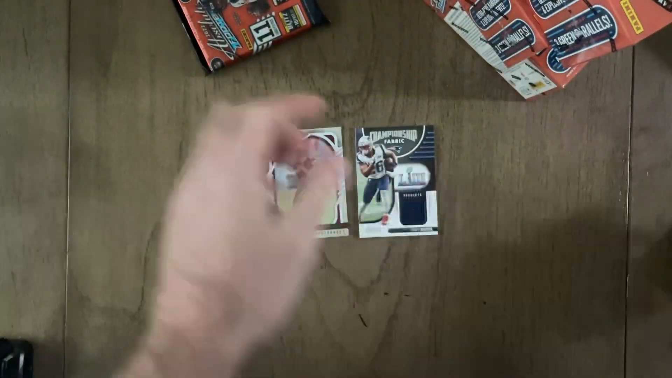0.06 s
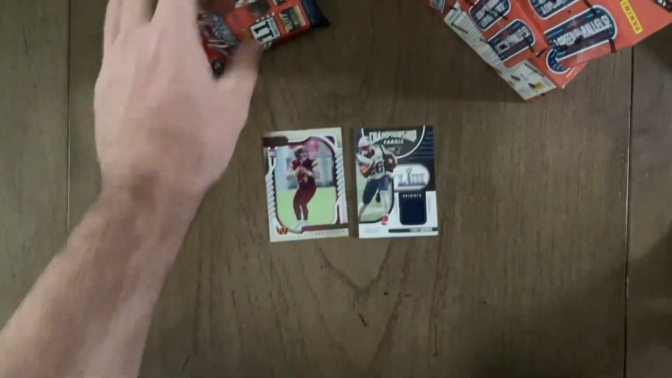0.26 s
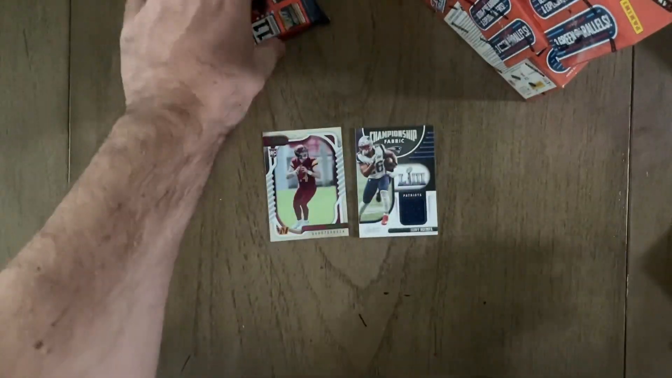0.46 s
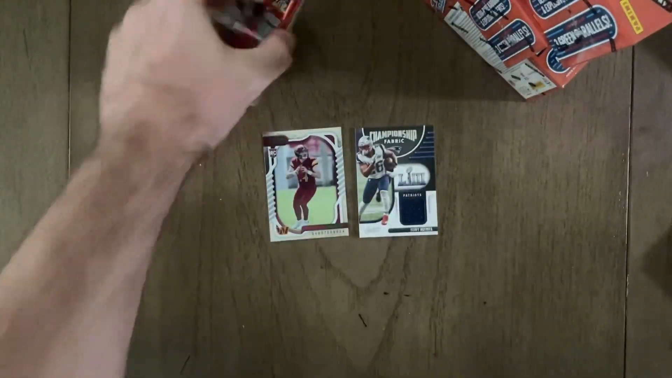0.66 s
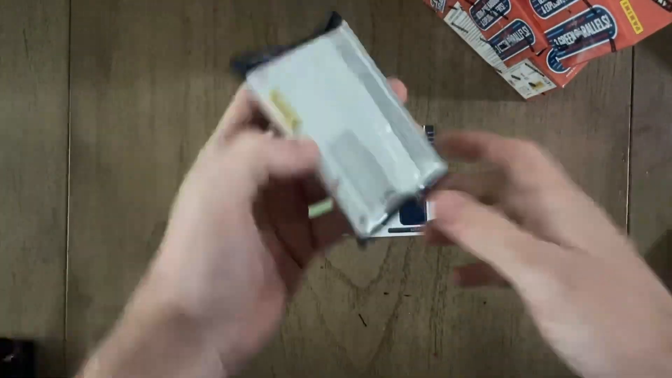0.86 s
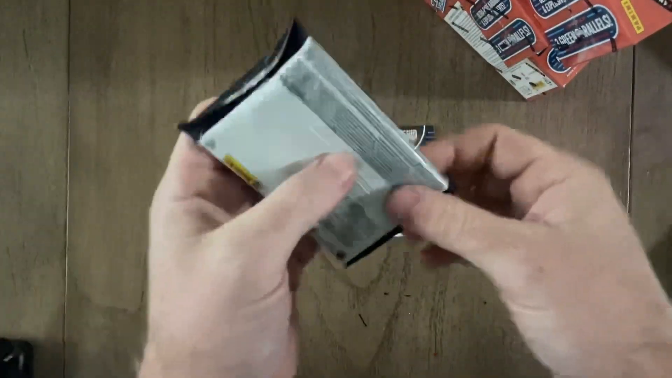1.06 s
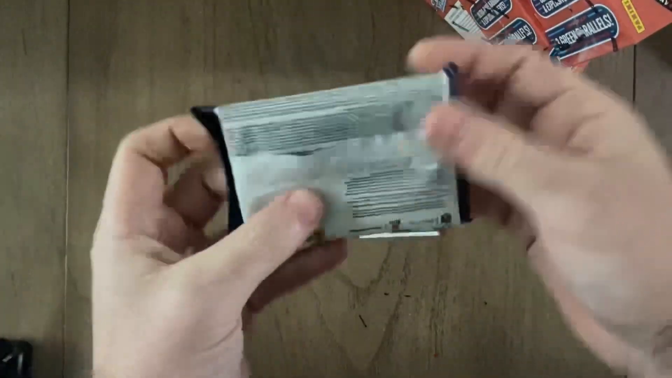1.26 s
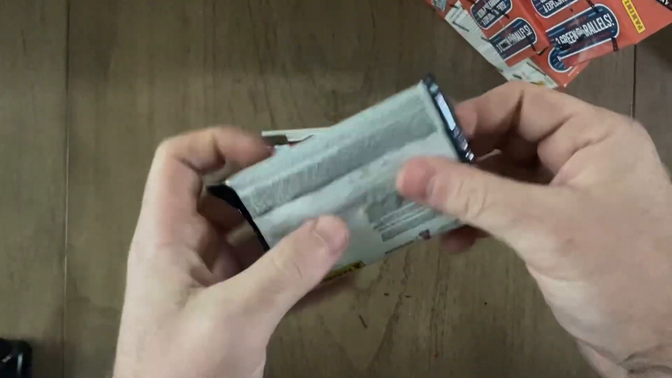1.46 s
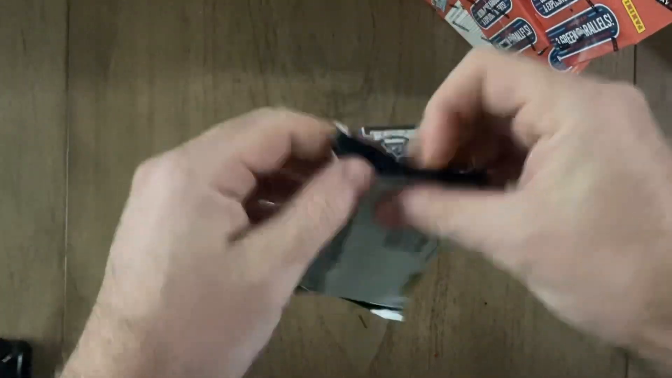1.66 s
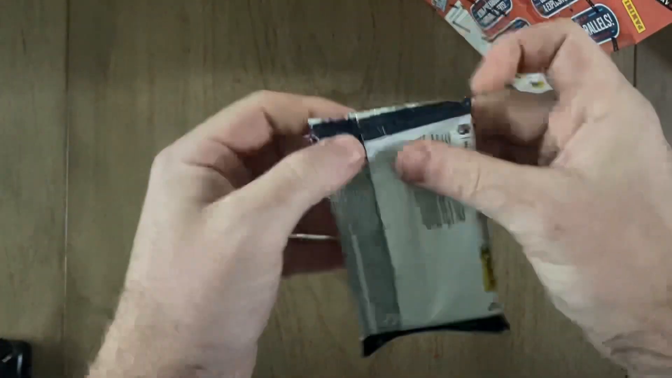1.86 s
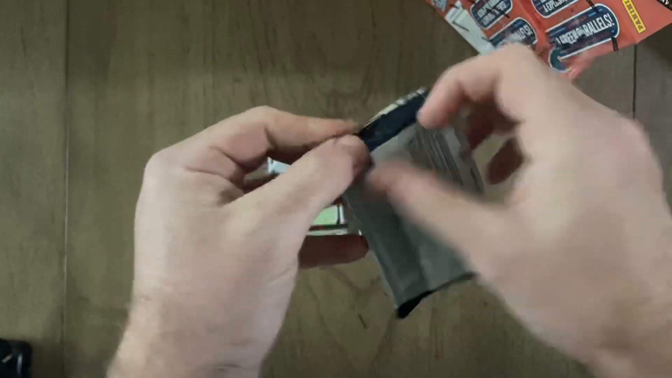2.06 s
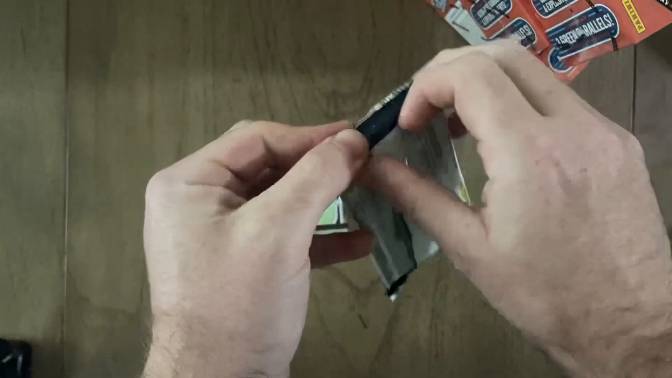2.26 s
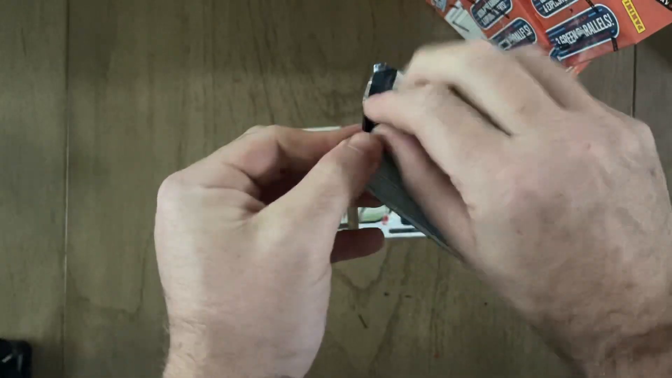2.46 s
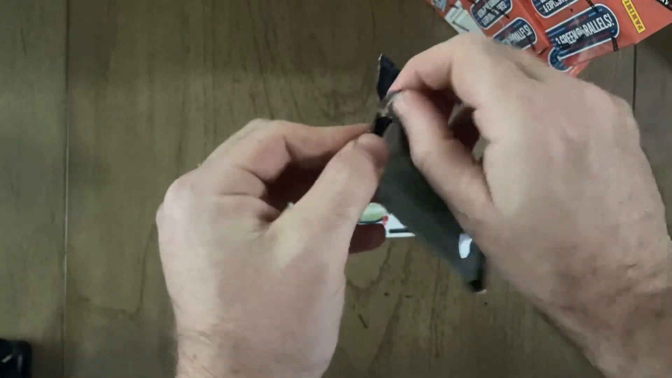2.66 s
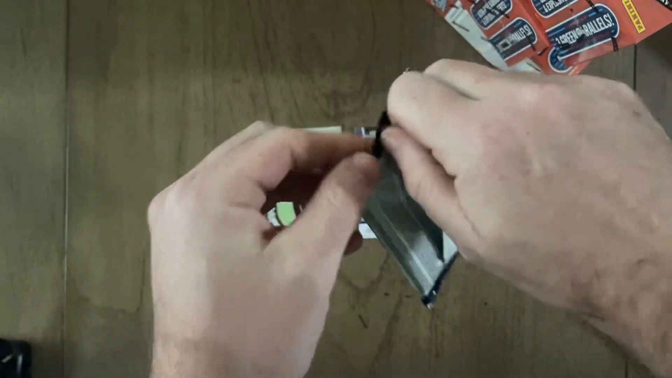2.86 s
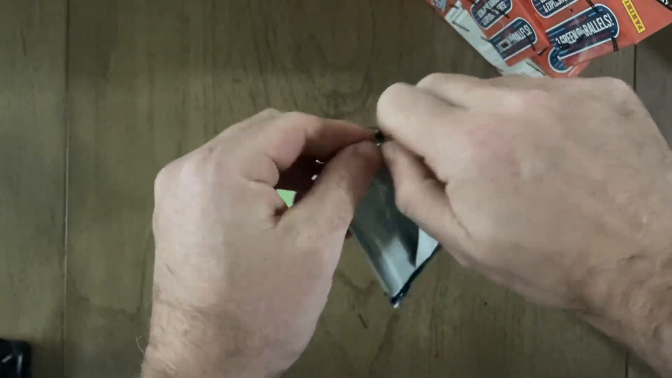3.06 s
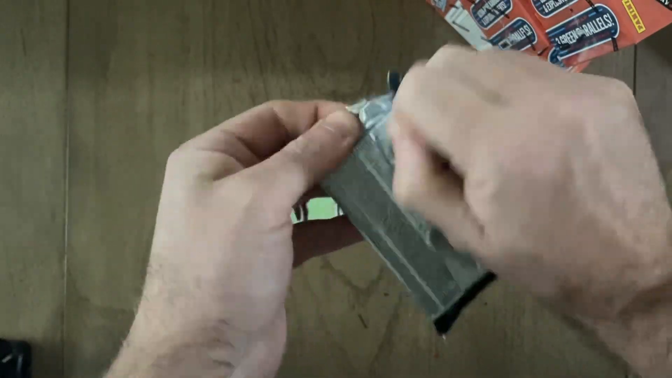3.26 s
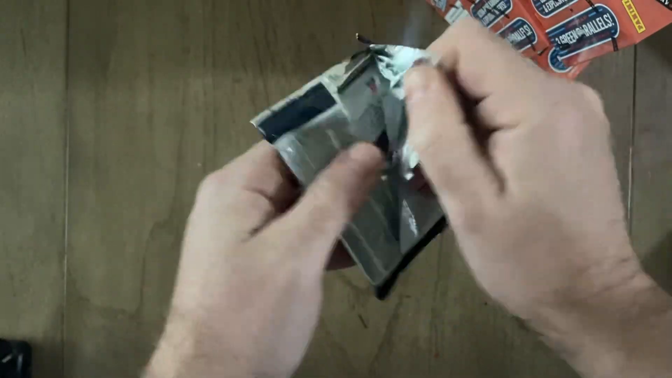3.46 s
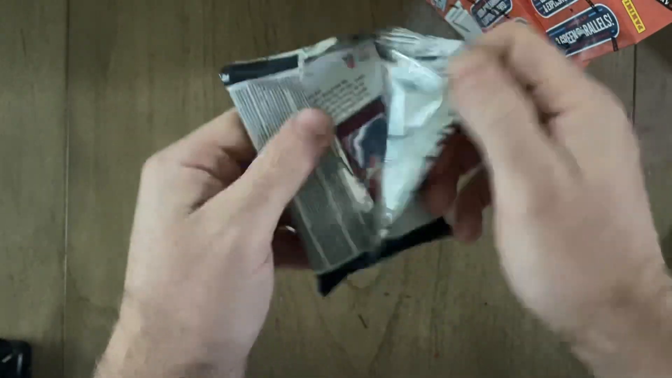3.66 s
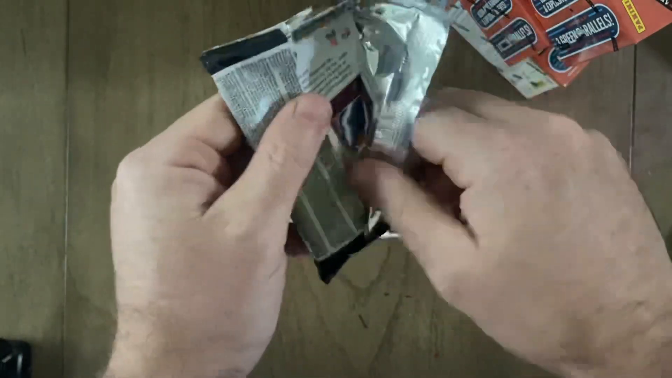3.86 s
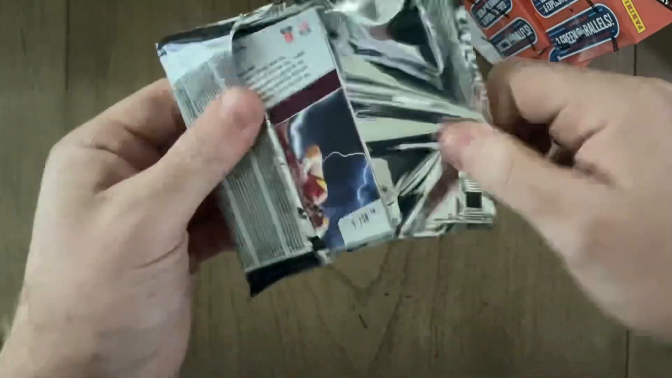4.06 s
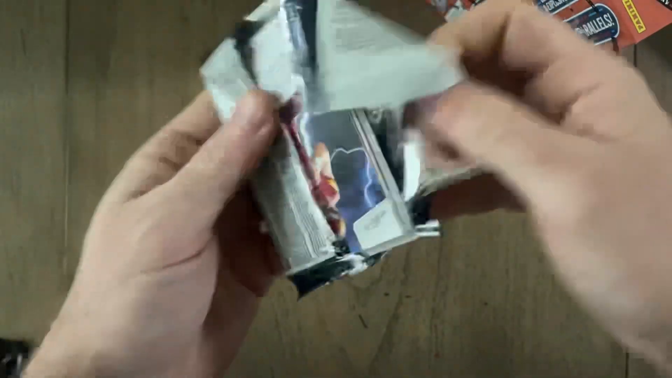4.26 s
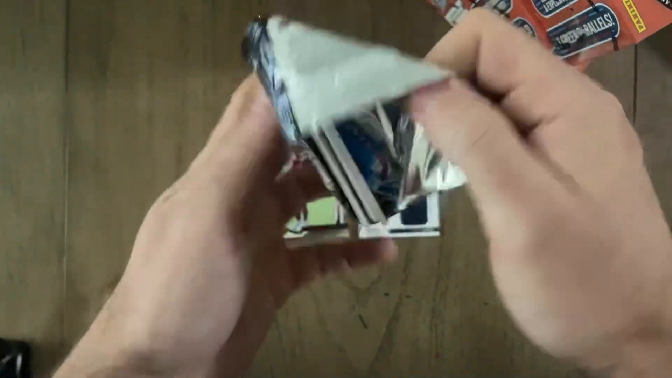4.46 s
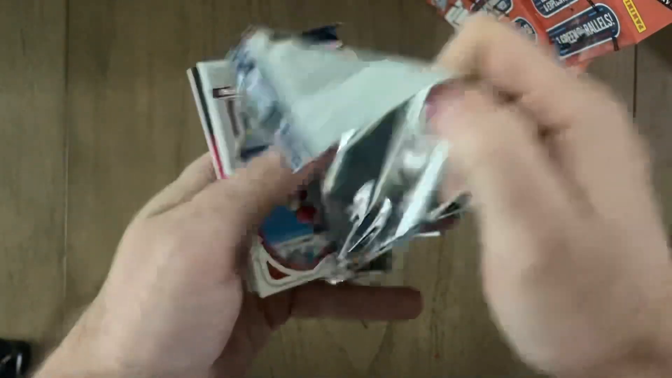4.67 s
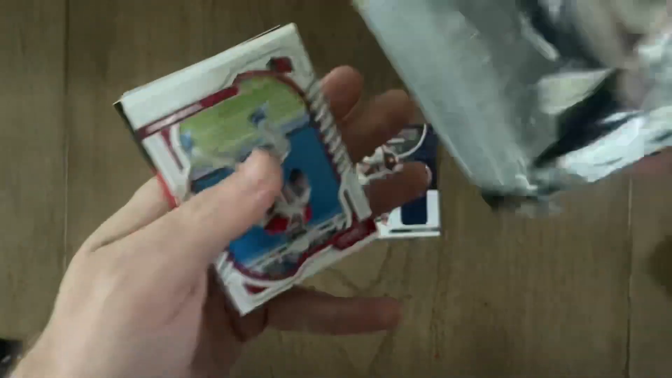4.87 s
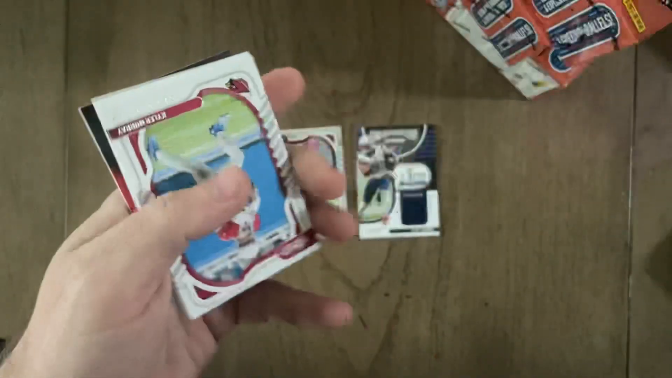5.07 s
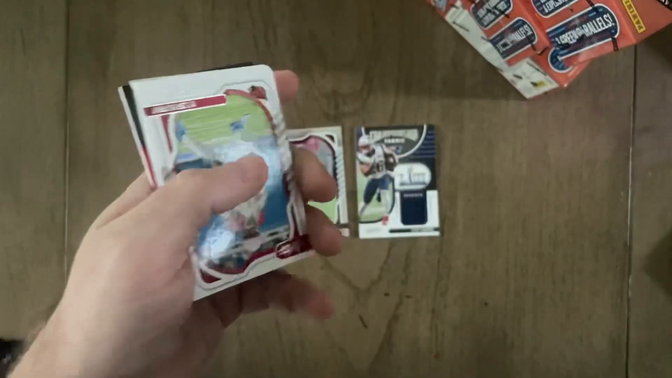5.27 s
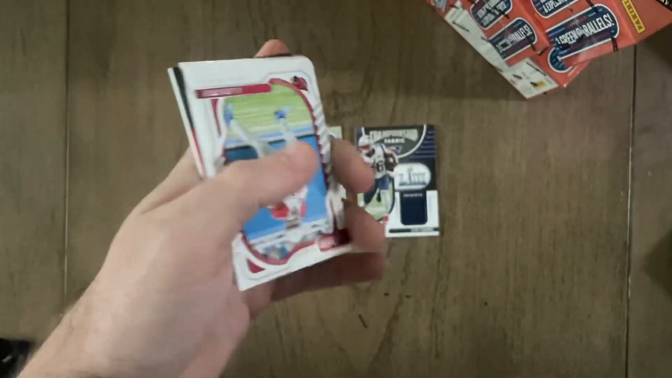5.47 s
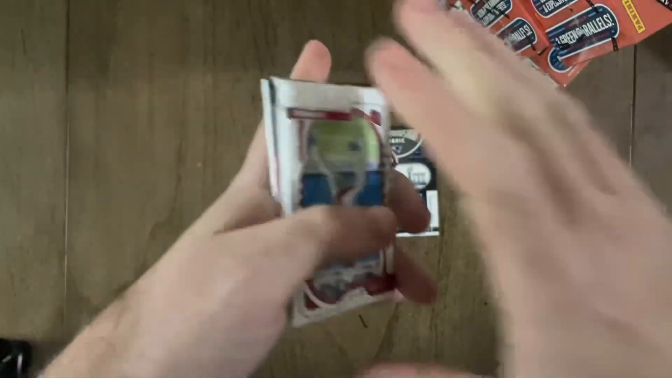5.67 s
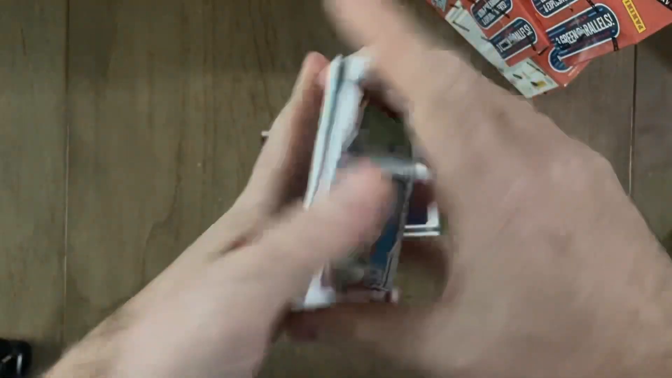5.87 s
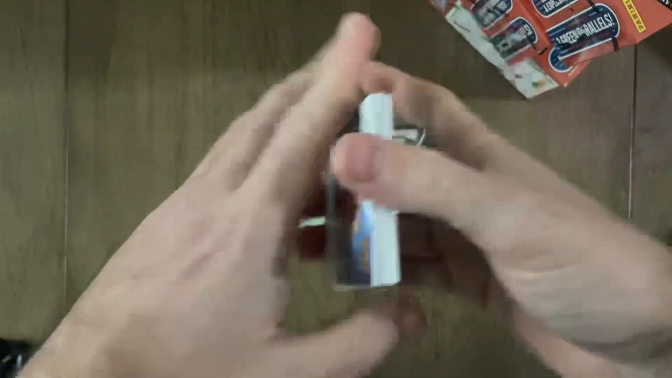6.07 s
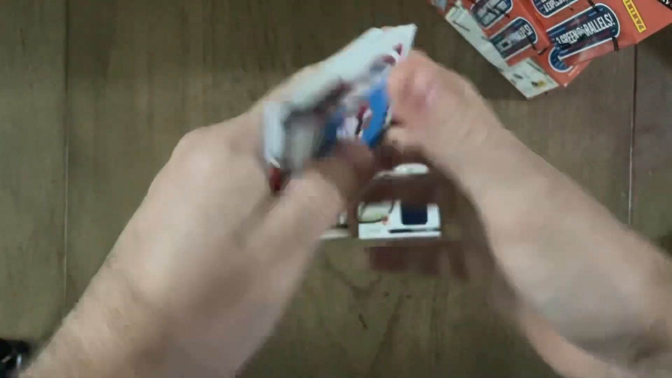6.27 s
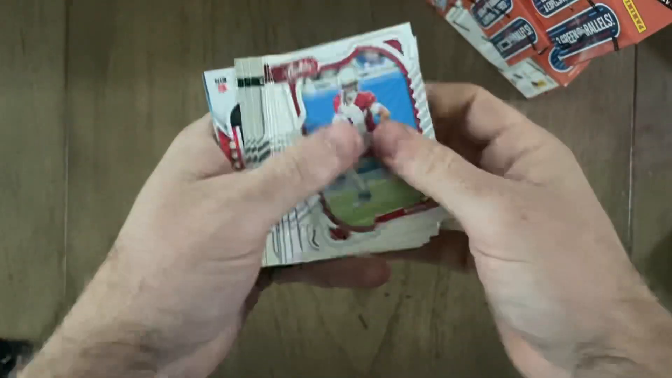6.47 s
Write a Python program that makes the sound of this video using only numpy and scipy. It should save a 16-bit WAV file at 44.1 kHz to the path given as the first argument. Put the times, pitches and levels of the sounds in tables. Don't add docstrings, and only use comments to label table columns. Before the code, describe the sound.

A close, wide stereo pickup in a small quiet room with faint air and low table rumble. At about 0.2 s a hand brushes past and thuds on the table, leaving a low hum that fades over the next seconds. After near quiet, from 0.8 to 1.6 s a sealed foil packet is lifted and turned with light, separate dry snaps. From 1.6 to 2.7 s fingers pinch the seam, giving brighter crackles and a sharper cluster near 2.55 s. Stronger snaps and tearing begin around 3.1 s, with a hard crack at 3.55 s. The loudest crumpling comes at 3.9-4.25 s, low flaps and thuds beneath it. Crinkling continues, swelling again at 4.55-4.9 s with dull jolts as the wrapper comes off. Then cards slide and tick softly until about 5.6 s, followed by near silence and faint brushes around 6.1-6.5 s.

```python
import sys
import numpy as np
from scipy import signal
from scipy.fft import rfft, irfft, next_fast_len
from scipy.io import wavfile
from scipy.ndimage import uniform_filter1d, map_coordinates

SR = 44100
rng = np.random.default_rng(int(sys.argv[2]) if len(sys.argv) > 2 else 0)


def volts(x):
    e = np.asarray(x, float) / 20
    return 10 ** e


def dump(signal):
    limited = np.clip(np.atleast_2d(signal).T, -1, 1)
    pcm = np.round(limited * 32767).astype(np.int16)
    wavfile.write(sys.argv[1], SR, pcm)


N = 287532

# frequency in Hz, level in dB per Hz.
FOIL_COLOUR = [(300, -23.5), (750, -7), (1120, -6), (1500, -1.5), (2300, -1.5), (2850, 1), (3600, -3),
               (4500, -1), (5500, -9.5), (7200, -21.5), (10000, -35), (15500, -51.5)]
# frequency in Hz, level in dB per Hz.
EDGE_COLOUR = [(4000, -20), (6000, -4), (7600, -5), (10000, -9), (13000, -20.5), (14200, -24.5),
               (15700, -12), (16300, -65.5)]


def unit(x):
    return x / np.sqrt(np.mean(x ** 2) + 1e-20)


def along(points, hz):
    f, v = np.transpose(points)
    return np.interp(np.log(hz + 1), np.log(f + 1), v)


def curve(rows):
    return np.interp(np.arange(N) / SR, *np.transpose(rows))


def wobble(rate):
    knots = rng.standard_normal(int(N * rate / SR) + 4)
    return map_coordinates(knots, [np.arange(N) * rate / SR])


def filtered(x, response):
    m = next_fast_len(N + SR // 4)
    return irfft(rfft(x, m) * response(np.fft.rfftfreq(m, 1 / SR)), m)[..., :N]


def noise(spectrum):
    return unit(filtered(rng.standard_normal((2, N)), lambda hz: volts(along(spectrum, hz))))


def patchy(x, depth_db):
    z = signal.stft(x, nperseg=256)[2]
    field = uniform_filter1d(rng.standard_normal(z.shape[1:]), size=3, axis=0)
    field = uniform_filter1d(field, size=10, axis=1)
    return signal.istft(z * volts(depth_db * unit(field)), nperseg=256)[1][:, :N]


def rings(s, db, hz, cycles, size=320):
    t = np.arange(size) / SR
    u = np.clip(hz, 100, 16000)[:, None] * t
    fade = np.hanning(2 * size)[size:]
    shape = volts(db)[:, None] * u / cycles * np.exp(1 - u / cycles) * fade
    at = (np.round(s * SR).astype(int)[:, None] + np.arange(size)).ravel()
    phases = np.array([0 * s, 2 * np.pi * rng.random(len(s))])[..., None]
    waves = [(shape * np.sin(2 * np.pi * u + p)).ravel() for p in phases]
    return np.array([np.bincount(at, wave, N + size)[:N] for wave in waves])


def puffs(s, db, life, spectrum, size=400):
    u = np.arange(size) / SR / life
    at = (np.round(s * SR).astype(int)[:, None] + np.arange(size)).ravel()
    shape = volts(db)[:, None] * u * np.exp(1 - u)
    swell = np.bincount(at, shape.ravel(), N + size)[:N]
    return filtered(swell * rng.standard_normal((2, N)), lambda hz: unit(volts(along(spectrum, hz))))


def strokes(rows, rise, fall):
    t = np.arange(0, N + 64, 64) / SR
    s, held, db = np.transpose(rows)[..., None]
    each = db - rise * np.clip(s - t, 0, None) - fall * np.clip(t - s - held, 0, None)
    total_db = 10 * np.log10(np.sum(volts(each) ** 2, 0) + 1e-12)
    return np.interp(np.arange(N) / SR, t, total_db)


def effort(moves):
    rise, fall, settle_fall = 960, 1400, 167
    settle_db = -7
    move = volts(strokes(moves, rise, fall))
    settling = volts(settle_db + strokes(moves, rise, settle_fall))
    return np.hypot(move, settling)


def room_tone():
    # frequency in Hz, level in dB per Hz.
    air = [(30, -15.5), (100, 3), (300, -1), (800, -29.5), (2300, -27.5), (5000, -31), (6600, -36.5),
           (7200, -59.5)]
    hiss = [(7600, -38), (8500, 0), (12400, -8), (13200, -13.5), (16000, -20)]
    return volts(-69.5) * noise(air) + volts(-100.5) * noise(hiss)


def leaning_arms():
    # frequency in Hz, level in dB per Hz.
    table_colour = [(20, -30.5), (37, -19.5), (59, -2.5), (92, -4.5), (134, -5), (173, -15), (400, -27.5),
                    (600, -69.5)]
    # time in seconds, rumble in dB.
    leaning = [(0, -54.5), (.14, -73), (.38, -61), (1.0, -59), (2.2, -59.5), (4.4, -59.5), (5.0, -62.5),
               (5.8, -60), (5.97, -63.5), (6.52, -65.5)]
    return volts(curve(leaning)) * unit(volts(1.3 * wobble(24)) * noise(table_colour))


def loose_sheet(pull, slide):
    # frequency in Hz, level in dB per Hz.
    flap_colour = [(100, -21.5), (200, -8), (350, -3), (700, 0), (1100, -7), (2000, -38.5)]
    # time in seconds, level in dB over the crackle.
    looseness = [(0, 9.5), (.45, 0), (.8, -11), (2.2, -10), (2.5, -20.5), (3.2, -26.5), (3.32, -15.5),
                 (3.95, -5.5), (4.05, 0), (4.12, -8), (4.7, -9.5), (4.85, -6), (5.6, 5.5), (6.1, -10)]
    stir_db = -76
    gain = np.hypot((pull + 0.24 * slide) * volts(curve(looseness) + 4.0), volts(stir_db))
    gusts_db = 5.5 * np.tanh(0.84 * wobble(40))
    return gain * unit(volts(gusts_db) * noise(flap_colour))


def sliding_hands():
    # start in seconds, time held in seconds, brush level in dB.
    slides = [(.175, 0.031, -64), (.205, 0.043, -51.5), (.25, 0.0746, -60.5), (.46, .08, -59.5),
              (4.92, 0.056, -44.5), (5.0, 0.12, -59.5), (5.15, 0.081, -51.5), (5.281, 0.14, -55.5),
              (5.47, 0.12, -60), (5.781, 0.083, -70), (5.845, .01, -70), (6.103, 0.03, -63.5),
              (6.135, 0.015, -63), (6.18, 0.041, -57.5), (6.43, 0.085, -65)]
    return effort(slides)


def card_brush(slide):
    # frequency in Hz, level in dB per Hz.
    card_colour = [(600, -8.5), (1300, -2.5), (2500, -1.5), (3300, -4.5), (4400, -1.5), (6300, -18),
                   (7500, -39), (12000, -70)]
    brush = volts(2.3 * wobble(70)) * patchy(noise(card_colour), depth_db=3.0)
    return slide * volts(-7.5) * unit(brush)


def stand_hum():
    # time in seconds, hum in dB.
    hum = [(.18, -73), (.24, -42), (.6, -49.5), (1.0, -54.5), (1.3, -48.5), (1.6, -62), (2.3, -60.5),
           (3.0, -66)]
    phase = 2 * np.pi * np.cumsum(55 + 1.5 * wobble(3.2)) / SR
    level_db = curve(hum) - 1.5 + 1.4 * wobble(5.9)
    return volts(level_db) * np.sin(phase) * [[1], [0]]


def snaps(rows, crack_db):
    pack_modes = [1150, 2560, 4350]
    s, db, hz, edge_db, body_db = np.transpose(rows)
    luck = rng.standard_normal((len(s), 7))
    ring = rings(s + .0006 - 1.24 / hz, db - 1.0, hz, cycles=1.49)
    for k, mode in enumerate(pack_modes):
        bent_hz = mode * np.exp(0.1 * luck[:, k + 3])
        ring += rings(s, db - 13 + 3 * luck[:, k], bent_hz, cycles=mode * .0007)
    ring += rings(s + 0.00033, db - 11.5, 1.175 * hz, cycles=0.38)
    body_hz = 400 * np.exp(0.18 * luck[:, -1])
    body = rings(s - .001, db + body_db - 6.5, body_hz, cycles=0.99, size=600)
    crack = puffs(s - .0001, 0.86 * db + crack_db - 3.5, 0.00048, FOIL_COLOUR)
    rattle = puffs(s - .0008, 0.76 * db + crack_db - 12, 0.0023, FOIL_COLOUR, size=900)
    edge = puffs(s - .0001, db + edge_db + 5.5, 0.00079, EDGE_COLOUR)
    return ring + body + crack + rattle + edge


def foil_creases():
    # time in seconds,
    # peak in dB, ring in Hz, edge in dB, body in dB.
    buckles = [(0.2009, -40.5, 4020, -51, -16), (0.4586, -52.5, 1090, -52, -2),
               (0.4982, -44, 3520, -50, -25), (0.5618, -52.5, 1360, -24, -23), (0.7968, -39, 3400, -16, -7),
               (0.8786, -42, 4600, -34, -16), (0.907, -35, 3100, -39, -24), (0.9123, -41, 3200, -35, 3),
               (0.9186, -57, 860, -6, -9), (0.9681, -42.5, 2900, -29, -10), (0.9833, -41, 3420, -31, -4),
               (1.0234, -37.5, 1110, -29, -0.5), (1.0311, -36, 2860, -29, -11),
               (1.0724, -30.5, 3050, -51, -13), (1.1077, -34.5, 4100, -42, -21),
               (1.1174, -37, 4220, -29, -26), (1.1347, -33.5, 2630, -35, -12), (1.156, -40, 1830, -42, -16),
               (1.1862, -24, 2190, -61, -27), (1.2, -40, 2380, -38, -21), (1.222, -52, 4200, -25, -21),
               (1.2408, -39, 2830, -40, 0), (1.3216, -32, 2860, -35, -7), (1.325, -26.5, 2550, -24, -20),
               (1.4126, -43, 5330, -24, -14), (1.4503, -34.5, 2510, -21.5, -21),
               (1.4609, -37.5, 3550, -35, -5), (1.5046, -33.5, 4000, -22, -29),
               (1.5235, -40, 3270, -32, -26), (1.5475, -42, 2260, -19, -17), (1.5682, -34, 4240, -24, -29),
               (1.5752, -33.5, 2630, -22, -34), (1.5889, -39.5, 1230, -42, -24),
               (1.632, -41, 3120, -31, -10), (1.668, -40, 4030, -10.5, -20), (1.6705, -29, 2760, -33, -31),
                (1.6802, -28.5, 4500, -19.5, -11), (1.6857, -28.5, 2470, -19, -7),
                (1.739, -26.5, 1080, -21, -4), (1.745, -35.5, 2600, -18, -13),
                (1.8903, -33.5, 3240, -27, -34), (1.9346, -31, 3220, -36, -26),
                (1.945, -42.5, 2740, -32, -12), (1.9937, -40.5, 3540, -25, -32.5),
                (2.073, -43, 1500, -37, -20), (2.0982, -30.5, 3020, -35, -40),
                (2.1169, -31.5, 4100, -25.5, -22), (2.2268, -41.5, 4430, -29, -22),
                (2.254, -37, 4266, -20.5, -38), (2.2793, -42, 3000, -16, -26), (2.288, -34, 2980, -34, -18),
                (2.3012, -27, 2950, -23.5, -10), (2.3194, -35.5, 3060, -30, -25),
                (2.3376, -33.5, 3000, -14, -13), (2.4733, -20.5, 2125, -30.5, -35),
                (2.508, -39, 2990, -11.5, -18), (2.5315, -25.5, 2920, -19, -36),
                (2.5406, -27, 2330, -22, -31), (2.5484, -20, 3330, -28, -39), (2.557, -25, 2300, -29, -33),
                (2.5605, -30.5, 4040, -14, -27), (2.5649, -24, 3060, -26, -25),
                (2.6013, -27.5, 2840, -26.5, -29), (2.6571, -35.5, 2230, -46, -19),
                (2.682, -42, 2330, -14, -4),
               (2.722, -36.5, 3030, -9.5, -19), (2.7334, -26, 3000, -20.5, -21),
               (2.768, -38, 3620, -17, -20), (2.8195, -36, 2680, -24, -15), (2.83, -37.5, 2590, -22, -22),
               (2.8823, -37.5, 1800, -23, -11), (2.899, -29.5, 3430, -19.5, -24),
               (2.905, -33, 2180, -26, -21), (2.9284, -43, 1150, -12, -26), (2.9343, -22, 2740, -28.5, -36),
               (2.9757, -41, 2800, -41, -23), (2.9835, -29, 4630, -20.5, -31),
               (3.0662, -36.5, 4100, -24, -33), (3.0908, -21.5, 3300, -39, -38),
               (3.171, -20.5, 3550, -15, -29), (3.174, -26.5, 1680, -15.5, -19),
               (3.1786, -19, 3570, -28.5, -35), (3.184, -24.5, 1550, -20.5, -7.5),
               (3.213, -22.5, 1160, -36.5, -19), (3.2307, -24, 3360, -34, -23),
               (3.262, -43, 3640, -42, -26), (3.285, -19, 2364, -32, -28.5), (3.2897, -44, 3620, -19, -33),
               (3.3007, -27, 830, -19.5, -10), (3.3378, -23.5, 1230, -35.5, -6),
               (3.3835, -22.5, 2870, -27, -21), (3.418, -30, 2820, -28, -23.5),
               (3.426, -19.5, 1094, -25, -25), (3.4409, -28.5, 1520, -32, -20.5),
               (3.4597, -20.5, 2700, -25.5, -4), (3.5162, -23, 4530, -23, -25),
               (3.5205, -23.5, 3520, -27.5, -20), (3.53, -20.5, 2792, -28, -20),
               (3.5456, -13, 840, -34, -19), (3.5506, -12, 2300, -35.5, -12.5),
               (3.5532, -9.5, 1210, -33, -3), (3.6141, -25, 1120, -41.5, -16),
               (3.6483, -32.5, 2410, -35, -12.5), (3.66, -31, 2670, -37.5, -8.5),
               (3.673, -24, 3320, -25, -6), (3.7038, -33.5, 2745, -25, -17), (3.7878, -31, 2183, -29, -11),
               (3.7912, -27, 1534, -28.5, -3), (3.831, -32, 1388, -39, -7.5),
               (3.847, -15, 1185, -39.5, -20), (3.8554, -38.5, 1088, -8.5, -12.5),
               (3.862, -35, 1099, -30.5, -20), (3.8774, -33, 2930, -19.5, -31),
               (3.9051, -25, 2696, -37, -9), (3.917, -22.5, 863, -32, -7.5),
               (3.9256, -23, 841, -25.5, -1.5), (3.9491, -17.5, 1261, -25.5, -9),
               (3.9543, -4.5, 1170, -39, -8.5), (3.9798, -11.5, 3924, -24, -10.5),
               (3.9898, -14, 858, -27, -9), (3.9974, -8, 1784, -27, -11.5), (4.032, -14, 1914, -29.5, -10),
               (4.035, -17.5, 1160, -35, -9), (4.0426, -15, 2470, -42.5, -4.5),
               (4.0512, -9.5, 1226, -45, 5), (4.0889, -32, 1120, -15, -11), (4.147, -27, 898, -48, -2),
               (4.1568, -21, 1035, -39, -11.5), (4.166, -9.5, 1063, -35, -11.5),
               (4.1699, -21, 3164, -24, -19), (4.185, -21, 2210, -35.5, -18),
               (4.1941, -25.5, 2445, -37, -12.5), (4.202, -23.5, 2616, -31, -16),
               (4.2237, -18, 932, -36.5, -5.5), (4.2299, -28.5, 4210, -22.5, 7.5),
               (4.2347, -20.5, 1015, -26.5, -3), (4.26, -22, 1056, -30.5, -22),
               (4.3042, -23, 2225, -46, -3.5), (4.321, -31.5, 2590, -23, -22),
               (4.3305, -22, 3550, -26, -26), (4.3455, -24, 1680, -33, -15), (4.3544, -23, 1000, -29.5, -8),
               (4.3706, -24.5, 960, -26, -18), (4.3977, -18.5, 2740, -24.5, -6.5),
               (4.4286, -42, 1550, -30, -14), (4.4362, -39, 5020, -40.5, -22.5),
               (4.4751, -19, 990, -29.5, -8), (4.49, -28.5, 4240, -46, -17), (4.5059, -21.5, 990, -28, -15),
               (4.5199, -26.5, 1190, -29, -1), (4.548, -31, 990, -29, -7.5), (4.5724, -20.5, 2940, -34, 4),
               (4.5764, -19, 1550, -30, -11), (4.583, -13, 2100, -32, -39),
               (4.5985, -25.5, 2650, -29, -2.5), (4.6224, -23.5, 2513, -34.5, -12.5),
               (4.6441, -18, 1160, -27.5, -24.5), (4.6608, -30, 1338, -24, -22.5),
               (4.668, -16.5, 2360, -25, -4), (4.68, -22.5, 4350, -30, -44),
               (4.7062, -18, 2967, -30.5, -6.5), (4.747, -13, 2220, -27.5, -34),
               (4.753, -29.5, 910, -24, -17.5), (4.7753, -29, 980, -30, -19), (4.782, -15, 990, -24, -4),
               (4.7998, -20.5, 2800, -36.5, -7), (4.804, -21.5, 1980, -35, 10),
               (4.8089, -16.5, 2290, -36.5, 4), (4.8187, -23.5, 1880, -32.5, -20),
               (4.8299, -18, 3230, -42, -25), (4.8422, -14, 967, -29, -13.5), (4.8471, -18, 1041, -30, 1.5),
               (4.8709, -29, 1160, -32, 7), (4.8802, -24.5, 980, -23.5, -18), (4.9122, -32, 930, -30, -15)]
    return snaps(buckles, crack_db=-9.5)


def stack_jolts():
    # time in seconds, peak in dB, pitch in Hz.
    bumps = [(.215, -45, 198), (4.044, -19.5, 401.6), (4.572, -29.5, 288), (4.669, -26, 265),
             (4.743, -26, 225), (4.79, -23.5, 278), (4.804, -26, 197.2), (4.847, -20, 323.3)]
    return rings(*np.transpose(bumps), cycles=1.345, size=1200)


def table_blows():
    # frequency in Hz, level in dB per Hz.
    knock_colour = [(20, -40), (45, -6), (86, 6.5), (130, 4), (195, -5), (280, -3), (420, -19.5),
                    (660, -66.5)]
    # start in seconds, time held in seconds, rumble in dB.
    thuds = [(.22, 0.057, -43.5), (.43, 0.065, -55.5), (2.31, 0.054, -57), (3.32, 0.0058, -51.5),
             (3.47, 0.0098, -52), (3.78, 0.015, -55), (4.02, 0.011, -42), (4.19, 0.066, -46),
             (4.52, 0.0045, -45), (4.68, 0.088, -47), (4.825, 0.031, -33.5)]
    return volts(strokes(thuds, rise=220, fall=220)) * noise(knock_colour)


def gripping_hands():
    # start in seconds, time held in seconds, crackle level in dB.
    grips = [(.43, 0.046, -72), (.5, 0.12, -73.5), (.6, 0.13, -74), (.795, 0.0028, -46), (.9, 0.03, -49),
             (1.0, 0.23, -56.5), (1.325, 0.0097, -46), (1.45, 0.22, -56.5), (1.67, 0.041, -47.5),
             (1.74, 0.0072, -42.5), (1.89, 0.34, -59.5), (2.1, 0.042, -53.5), (2.26, 0.16, -52.5),
             (2.475, 0.04, -45), (2.535, 0.033, -36.5), (2.63, 0.17, -51.5), (2.82, 0.15, -52),
             (2.985, 0.0057, -42.5), (3.095, 0.021, -51)]
    tugs = [(3.16, 0.035, -29.5), (3.2, 0.024, -33.5), (3.289, 0.022, -33.5), (3.33, 0.21, -37.5),
            (3.52, 0.035, -32.5), (3.6, 0.11, -45.5), (3.79, 0.0071, -41), (3.849, 0.0014, -37.5),
            (3.925, 0.045, -30), (3.977, 0.039, -25.5), (4.029, 0.018, -29.5), (4.164, 0.085, -34.5),
            (4.309, 0.25, -42), (4.579, 0.011, -30), (4.66, 0.025, -28.5), (4.737, 0.12, -32),
            (4.789, 0.1, -34.5)]
    return effort(grips + tugs)


def crackle(level_db):
    clump_db = 4.6 * wobble(30)
    rate = 330 * volts(clump_db)
    s = np.flatnonzero(np.diff(np.floor(np.cumsum(rate) / SR))) / SR
    luck = rng.random((len(s), 3))
    s = np.clip(s + 0.0044 * luck[:, 0], 0, (N - 1) / SR)
    size_db = -2.5 * np.log(luck[:, 2] + 0.05) - 0.22 * clump_db[(s * SR).astype(int)]
    cracks = unit(puffs(s, size_db, 0.0014, FOIL_COLOUR, size=200))
    edges = unit(puffs(s, size_db * 0.61, 0.00028, EDGE_COLOUR, size=200))
    pings = unit(rings(s, size_db, 900 * 5.1 ** luck[:, 1], cycles=7.8, size=200))
    rub = unit(volts(2.2 * wobble(64)) * noise(FOIL_COLOUR))
    fizz = unit(volts(4.9 * wobble(36)) * noise(EDGE_COLOUR))
    creases = volts(-4.0) * cracks + volts(-35.0) * edges + volts(-13) * pings
    return volts(level_db) * (creases + volts(-8.0) * rub + volts(-35) * fizz)


def card_ticks():
    # time in seconds, peak in dB, ring in Hz, edge in dB.
    ticks = [(4.9508, -30, 3320, -48), (5.1397, -54, 2820, -52), (5.1561, -39.5, 3160, -47),
             (5.2675, -45, 4570, -22), (5.3472, -47, 3200, -25), (6.102, -63.5, 2480, -44),
             (6.138, -54, 2530, -45)]
    return snaps([(*row, -30) for row in ticks], crack_db=-12)


def room(x):
    # frequency in Hz, time to fall by 60 dB in seconds.
    walls = [(200, 0.14), (2000, 0.31), (6000, 0.41), (10000, 0.17)]
    hz, t, z = signal.stft(rng.standard_normal((2, SR // 3)), SR, nperseg=256)
    decay = volts(-60 * t / along(walls, hz)[:, None])
    tail = signal.istft(z * decay, SR, nperseg=256)[1]
    late = np.pad(x, ((0, 0), (200, 0)))
    return signal.fftconvolve(late, tail / np.linalg.norm(tail[0]), axes=1)[:, :N]


def scene():
    pull, slide = gripping_hands(), sliding_hands()
    rustle = patchy(crackle(20 * np.log10(pull) - 2), depth_db=2.5)
    pack = foil_creases() + card_ticks() + rustle + loose_sheet(pull, slide) + card_brush(slide)
    thud = table_blows() + stack_jolts() + stand_hum() + leaning_arms()
    return pack + volts(-14.5) * room(pack) + thud + room_tone()


def low_pass(x):
    return signal.sosfilt(signal.butter(12, 15900, fs=SR, output="sos"), x)


def record(dry):
    # frequency in Hz, likeness from 0 to 1.
    alike = [(60, 0.995), (220, 0.96), (600, 0.97), (1300, 0.93), (2500, 0.8), (4000, 0.7), (5600, 0.4),
             (7000, 0.92), (15000, 0.8)]
    # frequency in Hz, lead of the left in radians.
    lead = [(40, 0.056), (90, 0.12), (170, 1.2), (300, 2.48), (620, 3.14), (1000, 3.78), (1800, 5.2),
            (3200, 4.98), (4200, 5.17), (5000, 4.5), (5400, 4.4), (6400, 7.77), (6900, 9.2), (8800, 11),
            (9800, 12.2), (12000, 12.8), (13100, 15.3), (16000, 16.3)]
    # frequency in Hz, left minus right in dB.
    lean = [(60, .3), (100, 1), (160, 3.5), (270, 7.5), (450, 4.5), (740, 2.5), (1300, 3), (2100, 3.5),
            (3400, -.5), (4500, 2), (8000, .6)]
    ceiling = 0.8

    def share(hz):
        angle = np.arccos(np.clip(along(alike, hz), 0, 1)) / 2
        return np.array([np.cos(angle), np.sin(angle)])

    def spread(hz):
        half = volts(along(lean, hz) / 2) * np.exp(.5j * along(lead, hz))
        return np.array([half, 1 / half])

    same, other = filtered(dry, share)
    ports = filtered(np.array([same + other, same - other]), spread)
    ports = ports / (1 + np.abs(ports / ceiling) ** 4) ** .25
    return low_pass(ports)


dry = scene()
out = record(dry)
dump(out)
```